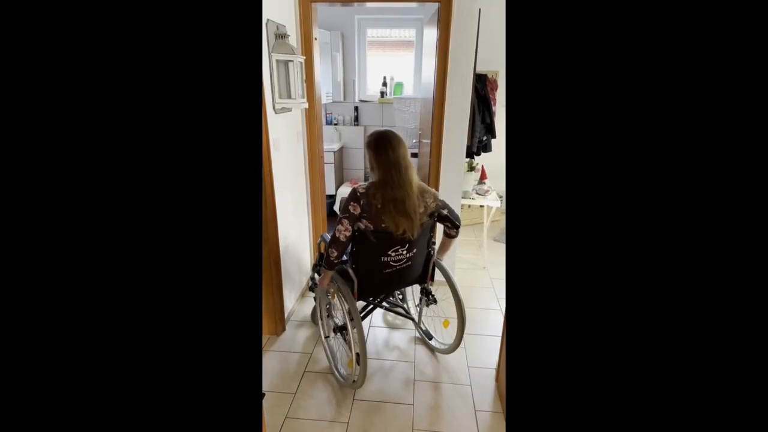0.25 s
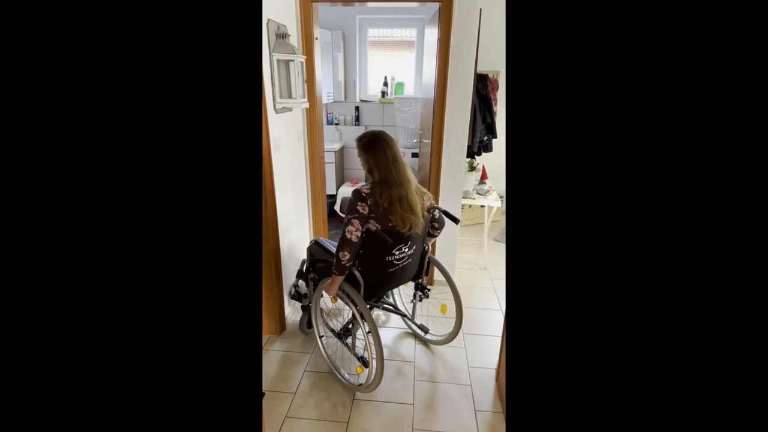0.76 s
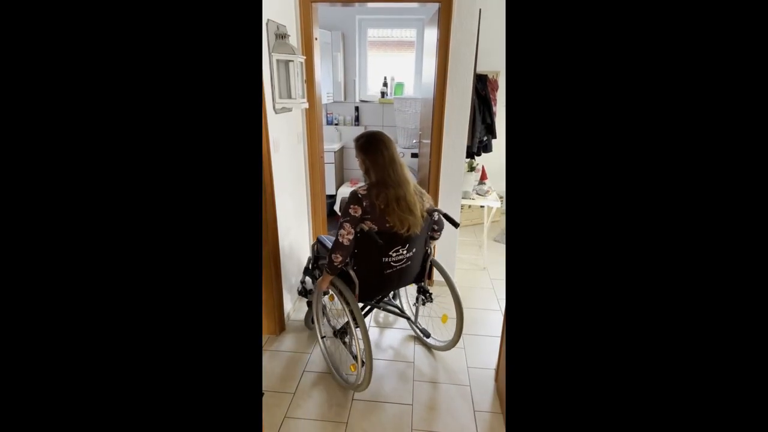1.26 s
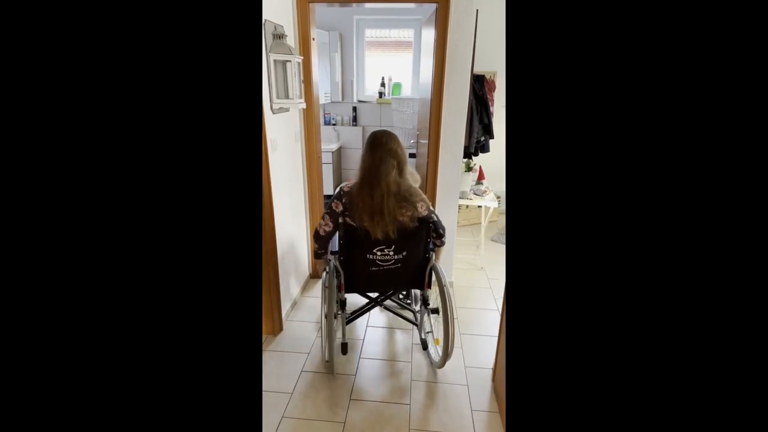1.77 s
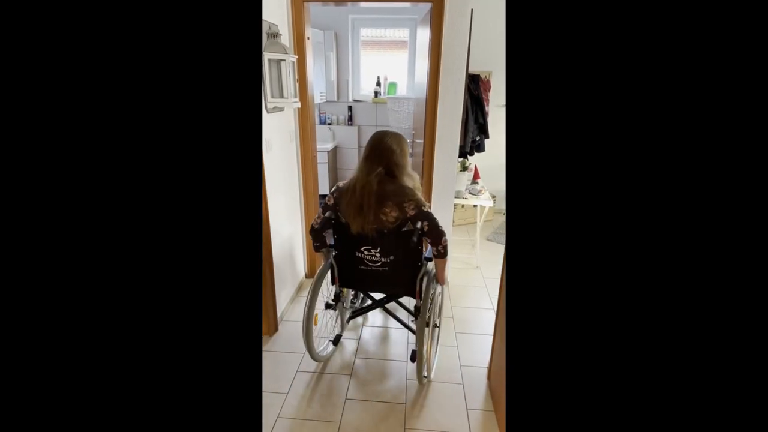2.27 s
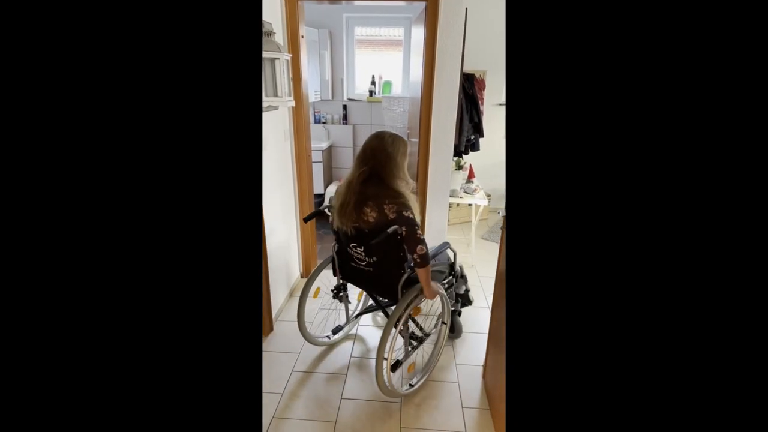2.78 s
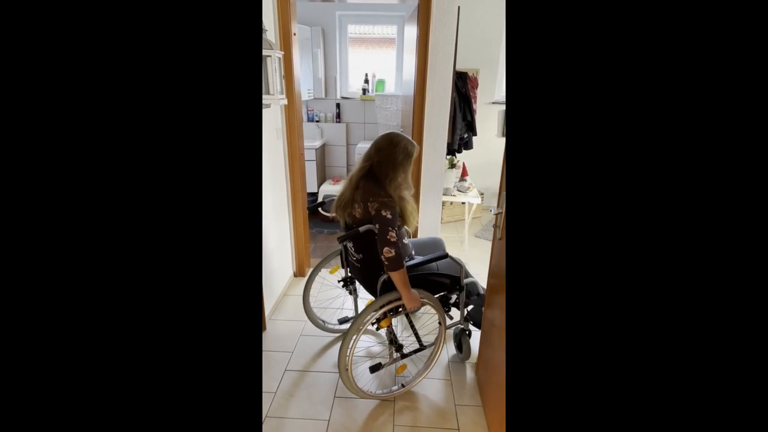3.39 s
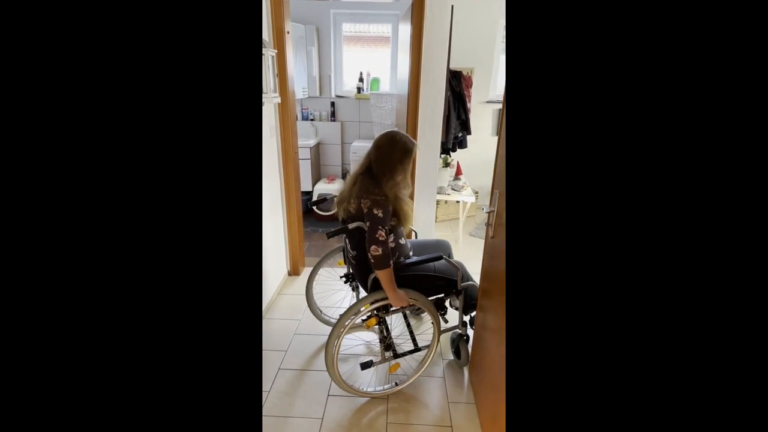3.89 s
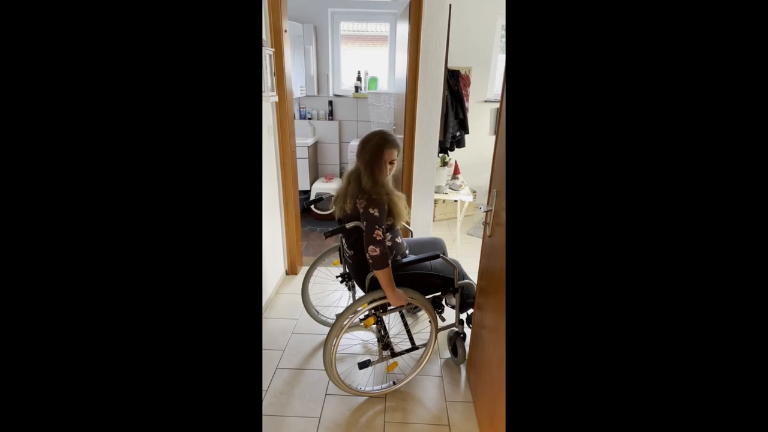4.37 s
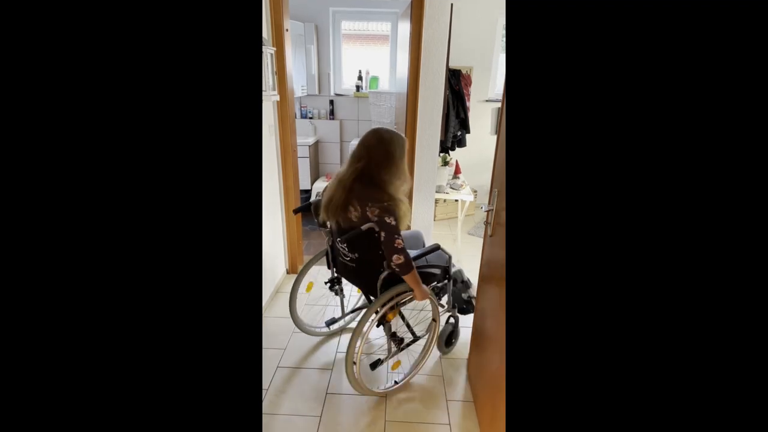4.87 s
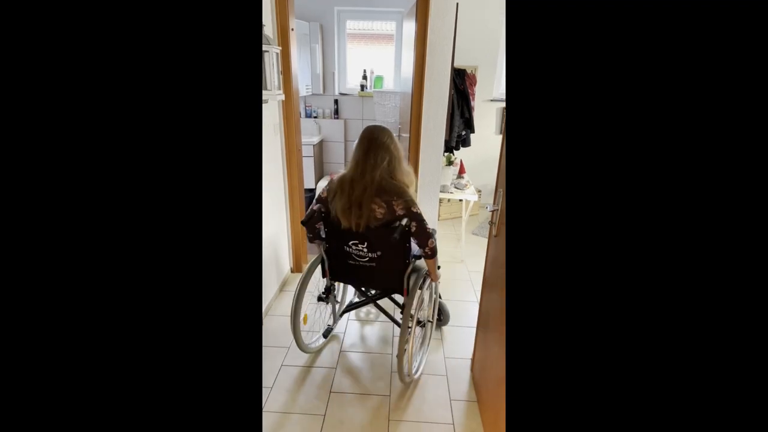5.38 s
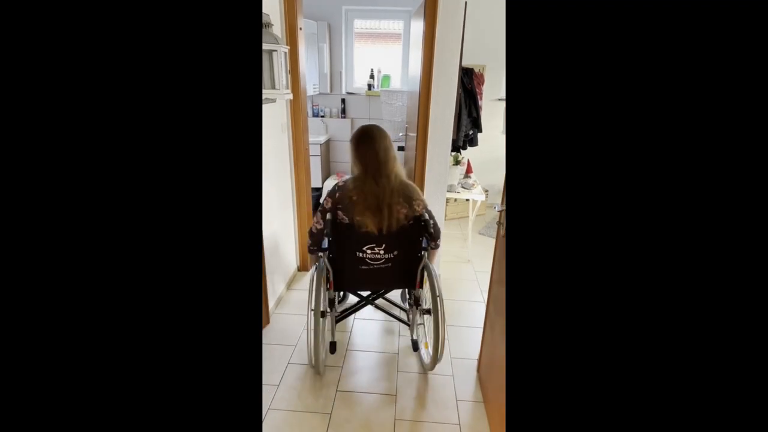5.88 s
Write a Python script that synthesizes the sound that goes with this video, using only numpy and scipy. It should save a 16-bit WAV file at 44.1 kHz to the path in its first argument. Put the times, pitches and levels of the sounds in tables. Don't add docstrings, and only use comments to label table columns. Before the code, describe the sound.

A wheelchair pivots back and forth on hallway tiles: palms scrape the metal rims, small ticks and squeaks, a dull wooden knock, sharp lever clicks.

```python
import sys
import numpy as np
from scipy import signal
from scipy.fft import rfft, irfft, next_fast_len
from scipy.io import wavfile
from scipy.ndimage import uniform_filter1d, map_coordinates

SR = 44100
rng = np.random.default_rng(int(sys.argv[2]) if len(sys.argv) > 2 else 0)


def level_to_linear(level):
    exponent = np.asarray(level, float) / 20
    return 10 ** exponent


def wav_out(sig):
    wavfile.write(sys.argv[1], SR, np.round(np.clip(np.atleast_2d(sig).T, -1, 1) * 32767).astype(np.int16))


N = 270935
T = np.arange(N) / SR


def unit(x):
    return x / np.sqrt(np.mean(x ** 2))


def add(out, start_s, wave):
    i = int(start_s * SR)
    lo, hi = max(i, 0), min(i + len(wave), N)
    out[lo:hi] += wave[lo - i:hi - i]


def decay(t, t60_s):
    return 1000. ** (-t / t60_s)


def onset(t, build_s):
    return 1 - np.exp(-t / build_s)


def walk(rate):
    k = int(SR / rate)
    levels = rng.standard_normal(N // k + 1)
    return 0.77 * uniform_filter1d(np.repeat(levels, k), k)[:N]


def slips(rate, scatter_db, flutter_db):
    ticks = (rng.random(N) < rate / SR) * rng.standard_normal(N)
    size_db = scatter_db * np.minimum(rng.exponential(size=N), 3.5)
    return unit(ticks * level_to_linear(size_db + flutter_db * walk(60)))


def ring(x, hz, width):
    return signal.lfilter(*signal.iirpeak(hz, hz / width, SR), x)


def body(x, modes, patchy_db, rate):
    out = np.zeros(N)
    for k, (hz, width, db) in enumerate(modes):
        level = level_to_linear(db + patchy_db * walk(rate))
        out += (-1) ** k * level * ring(ring(x, hz, 1.8 * width), hz, 3 * width)
    return unit(out)


def rings(modes, pitch, t, detune):
    out = np.zeros(len(t))
    for hz, db, t60_s in modes:
        weight, shift = rng.standard_normal(2)
        tone = np.sin(2 * np.pi * hz * pitch * (1 + detune * shift) * t)
        out += level_to_linear(db + 53 * detune * weight) * tone * decay(t, t60_s)
    return out


def contacts(rows, touch_db, rise, release_db_per_s):
    touch_s = .009
    power, t = np.zeros(N), T[:SR] - touch_s
    for start_s, length_s, db in rows:
        length_s = max(length_s, .005)
        corners_s = [-touch_s, 0, rise * length_s, length_s + 1e-4, length_s + 1]
        shape_db = np.interp(t, corners_s, [-40, touch_db, 0, 0, -release_db_per_s])
        add(power, start_s - touch_s, level_to_linear(2 * (db + shape_db)))
    return np.sqrt(power)


def bend(x, share):
    drift = share * walk(9)
    warped = np.arange(N) + np.cumsum(drift - drift.mean())
    return map_coordinates(x, [warped], order=1, mode="mirror")


def air():
    # pitch_hz, density_db (per Hz)
    spectrum = [(59, -47), (100, -17.5), (124, -20.5), (206, -25), (389, -32.5), (784, -39.5), (854, -43.5),
                (2420, -44.5), (16000, -60.5)]
    hz, db = np.transpose(spectrum)
    log_hz = np.log(np.fft.rfftfreq(N, 1 / SR) + 1)
    shape = level_to_linear(np.interp(log_hz, np.log(hz), db))
    return level_to_linear(-74.5) * unit(irfft(shape * rfft(rng.standard_normal(N)), N))


def sleeves():
    # start_s, length_s, level_db
    brushes = [
        (-.1, 0.28, -59.5),
        (.3, 0.2, -70),
        (2.22, 0.24, -58.5),
        (2.95, 0.26, -66),
        (4.75, 0.43, -62.5),
        (5.78, 0.06, -62),
        (6.03, .06, -58),
    ]
    # pitch_hz, width_hz, level_db
    cloth = [(5640, 2900, -8.5), (8100, 2300, -10.5), (10100, 1360, -7), (17300, 1440, 2.5)]
    rustle = body(slips(rate=12000, scatter_db=-3.0, flutter_db=1.5), cloth, patchy_db=5.5, rate=5.0)
    return contacts(brushes, touch_db=-4, rise=0.87, release_db_per_s=79) * rustle


def tyres():
    # time_s, level_db
    rolling = [(0, -62), (.34, -68.5), (.5, -62.5), (.62, -77), (.67, -59), (.83, -57), (1.08, -77),
               (1.34, -69), (1.37, -61.5), (2.03, -62.5), (2.2, -67), (2.42, -66), (3.2, -69.5),
               (3.55, -56), (3.81, -68), (4.35, -69.5), (4.52, -66), (6.14, -67.5)]
    # pitch_hz, width_hz, level_db
    floor = [(51, 12, 3), (89.6, 30, -13)]
    # start_s, length_s, level_db
    scrubs = [(.05, 0.063, -53), (.282, 0.017, -48.5), (.655, 0.094, -49.5), (.88, 0.08, -84),
              (1.1, 0.12, -60), (1.36, 0.08, -59), (1.535, 0.095, -47.5), (1.78, 0.33, -53.5),
              (2.2, 0.12, -60), (2.47, 0.056, -54), (2.75, 0.063, -58), (2.9, 0.28, -62.5),
              (3.5, 0.08, -59), (4.43, 0.33, -54.5), (4.85, 0.063, -64), (5.0, 0.14, -64),
              (5.14, 0.15, -58.5), (5.4, 0.17, -67), (5.56, 0.072, -49), (5.755, 0.028, -48),
              (5.885, 0.03, -52), (5.81, .03, -58), (2.255, 0.034, -55.5), (2.53, 0.038, -56),
              (.16, 0.049, -62), (5.98, 0.089, -52)]
    # pitch_hz, width_hz, level_db
    rubber = [(140, 45, -7), (207, 55, 1), (260, 50, 0), (325, 70, -4), (430, 120, -9), (560, 160, -12)]
    weight = level_to_linear(np.interp(T, *np.transpose(rolling)))
    boom = weight * body(rng.standard_normal(N), floor, patchy_db=2.5, rate=8)
    judder = body(slips(rate=1500, scatter_db=2.2, flutter_db=2.2), rubber, patchy_db=1.5, rate=14)
    scrub = contacts(scrubs, touch_db=-6, rise=0.23, release_db_per_s=161) * judder
    return boom + level_to_linear(-5.0) * scrub


def knock():
    # start_s, door_db, wall_db, pitch_factor
    bumps = [(0.66, -41.5, -56, 0.78), (1.362, -65, -52.5, 1.06), (2.37, -59.5, -58, 1.07),
             (2.849, -69, -59.5, 1.15), (3.322, -60, -56, 1.03), (3.82, -34, -41, 1.15),
             (3.831, -34, -65, 0.98), (3.859, -35.5, -57, .95), (3.887, -41, -35.5, 1.05),
             (3.968, -53, -41, 1.27), (5.569, -47.5, -60.5, 0.83)]
    # pitch_hz, level_db, t60_s
    door = [(199, -2, 0.16), (261, -7, 0.26), (311.6, -1.5, 0.14), (441.6, -5.5, 0.086),
            (560, -15.5, 0.089), (670, -8.5, 0.074), (858, -17.5, 0.057), (970, -11, 0.065),
            (1425, -21, 0.073)]
    # pitch_hz, level_db, t60_s
    wall = [(50, -8, .35), (87, 1.5, .75), (99, -6, .5), (120, -11, .3), (155, -11, .4), (205, -14, .4)]
    out, t = np.zeros(N), T[:30000]
    for start_s, door_db, wall_db, pitch in bumps:
        wood = rings(door, pitch, t, 0.027) * onset(t, 0.0025)
        boom = rings(wall, 0.96, t, 0.0008) * onset(t, 0.0036)
        add(out, start_s, level_to_linear(door_db) * wood + level_to_linear(wall_db) * boom)
    return out


def clicks():
    # start_s, level_db, pitch_hz, t60_s, treble_db (relative)
    snaps = [
        (4.5073, -18.5, 1050, .02, -34),
        (4.5078, -24, 1550, .014, -40),
        (4.5085, -25, 3300, .012, -40),
        (4.5125, -29, 2900, .016, -40),
        (4.5186, -14, 2950, .009, -52),
        (5.6145, -25, 2050, .012, -30),
        (5.6148, -29, 2900, .012, -40),
        (5.6155, -30, 960, .024, -40),
    ]
    # start_s, level_db, pitch_hz, treble_db (relative)
    joints = [(.059, -44.5, 506, -25), (.223, -38.5, 740, -18), (.279, -38, 900, -35),
              (.215, -50, 726, -30), (.244, -36, 620, -30), (.288, -38, 654, -35), (.308, -40, 256, -40),
              (.328, -46, 400, -40), (2.2, -43, 1200, -25), (2.203, -54, 750, -30), (2.484, -40, 298, -29),
              (3.999, -45, 1150, -35), (4.471, -42, 640, -15), (5.366, -56, 842, -20),
              (5.729, -43, 1040, -28), (5.893, -38.5, 400, -35), (5.77, -43, 440, -25),
              (.657, -41, 670, -4), (2.185, -43, 1010, -19), (2.452, -47.5, 735, -34),
              (2.47, -48.5, 460, -4), (1.536, -34.5, 960, -37), (1.212, -31.5, 926, -35),
              (2.856, -42, 990, -39), (2.531, -42, 1000, -24), (2.756, -39, 864, -34),
              (2.757, -39, 560, -37), (2.772, -37.5, 510, -36), (3.085, -49.5, 800, -22),
              (3.436, -63, 920, 7), (3.516, -43.5, 705, -33), (3.538, -41.5, 1080, -17),
              (4.421, -49.5, 636, 8.5), (4.44, -33, 645, -30), (4.551, -36, 780, -28), (4.617, -39, 640, 2),
              (4.671, -32.5, 646, -12), (5.134, -36, 790, -7), (5.396, -55, 850, 11),
              (5.615, -34, 700, -35), (5.976, -39, 1030, -0.5), (6.13, -29, 425, -24)]
    # start_s, level_db, pitch_hz, treble_db (relative)
    ticks = [(.058, -38.5, 2370, -15), (.108, -45, 2000, -15), (.178, -41, 3100, -14),
             (.191, -41, 2300, -10), (.205, -46, 3080, -1), (.223, -33, 1660, -13),
             (.276, -30.5, 1830, -25), (.226, -35, 2210, -20), (.226, -36, 3630, -20),
             (.258, -46, 3100, -18), (.415, -56, 1640, -30), (2.531, -43, 2100, -22),
             (4.44, -31, 1440, -19), (4.874, -46, 1530, -9), (4.94, -46, 2430, -10),
             (5.045, -44.5, 5300, -6), (5.074, -41, 1560, -15), (5.587, -36, 1720, -23),
             (5.788, -43, 2060, -25), (1.814, -29.5, 2940, -14), (2.1, -36, 3650, -7.5),
             (1.503, -54, 3140, -7), (4.508, -24, 2180, -15), (3.833, -48, 2480, -0.5),
             (3.86, -48, 2020, -1), (3.888, -52, 2000, 2), (5.6, -49, 3500, -3), (6.002, -33.5, 3560, -20),
             (.617, -44.5, 3190, 0.5), (.706, -28, 3500, -27), (.922, -45, 3090, -10),
             (1.091, -31, 3340, -20), (1.209, -24, 1590, -35), (1.214, -39, 1930, -28),
             (1.536, -30, 3060, -3), (3.539, -38.5, 2030, -9), (1.928, -45, 2070, 10),
             (2.0, -32.5, 3560, -1.5), (2.087, -35.5, 3480, -4), (2.181, -37, 1940, -11),
             (2.201, -34, 2400, -24), (2.214, -32.5, 2280, -28), (3.205, -55.5, 4210, -20),
             (2.854, -34.5, 2210, -43), (2.853, -33.5, 1440, -40), (3.999, -44, 2200, -45),
             (4.982, -45, 1500, -4), (5.207, -35, 2980, -12), (5.234, -35, 2960, -8.5),
             (5.729, -40.5, 4140, -14), (6.033, -36.5, 2770, -5)]
    rows = [*snaps]
    for table, t60_s in ((joints, 0.022), (ticks, 0.015)):
        rows += [(start_s, db, hz, t60_s, treble_db) for start_s, db, hz, treble_db in table]
    out, t = np.zeros(N), T[:6000]
    for start_s, db, hz, t60_s, treble_db in rows:
        noise = rng.standard_normal(len(t))
        tone = np.sin(2 * np.pi * hz * t) + 0.12 * np.sin(2 * np.pi * 2.4 * hz * t)
        rough = 1.45 * ring(ring(noise, hz, 0.73 * hz), hz, 1.44 * hz)
        crack = level_to_linear(treble_db) * 2 * ring(noise, 6950, 4300) * decay(t, 0.025)
        add(out, start_s, level_to_linear(db - 1.4) * ((tone + rough) * decay(t, t60_s) * onset(t, 0.001) + crack))
    return out


def squeaks():
    # start_s, length_s, pitch_hz, level_db, roughness_hz
    chirps = [(.858, .044, 900, -51.5, 30), (1.095, .12, 3650, -45, 350), (1.11, .09, 3150, -47, 300),
              (2.0, .13, 3600, -53, 200), (4.89, .04, 4150, -60, 150), (5.075, .04, 4150, -59, 150),
              (5.4, .06, 830, -54, 250), (5.41, .09, 2950, -55, 250), (5.99, .08, 3650, -51, 300),
              (2.86, .1, 2150, -60, 600), (5.135, .06, 3150, -46, 500), (5.205, .05, 3000, -48, 500),
              (5.135, .06, 790, -56, 600), (4.99, .07, 5250, -57, 900), (5.392, .11, 5450, -45.5, 1100),
              (5.47, .1, 5600, -53, 500), (.655, .07, 3150, -49, 300), (.93, .055, 3150, -47, 300),
              (1.855, .05, 3200, -45, 200), (4.53, .06, 2900, -48, 500), (1.93, .06, 2050, -53, 200),
              (5.98, .1, 2100, -53, 300), (5.44, .05, 1350, -50, 700), (5.62, .04, 2750, -46, 800),
              (5.785, .045, 1980, -50, 200), (5.785, .045, 3580, -52, 300)]
    out = np.zeros(N)
    for start_s, length_s, hz, db, rough_hz in chirps:
        t = T[:int(length_s * SR)]
        fall_db = 1.6 - .04 * rough_hz
        phase = 2 * np.pi * hz * t * (1 + .045 * t / length_s / 2)
        stack = sum(level_to_linear(fall_db * k) * np.sin((k + 1) * phase) for k in range(int(6500 // hz)))
        steady = .3 + 60 / rough_hz
        tremble = (steady + unit(walk(rough_hz))[:len(t)]) / np.hypot(1, steady)
        add(out, start_s, level_to_linear(db) * stack * tremble * np.hanning(len(t)) ** 0.34)
    return out


def hands():
    # start_s, length_s, ring_db, frame_db (relative), skin_db (relative)
    left_strokes = [(.616, 0.012, -56, -9, 4), (.655, 0.008, -43.5, -6, 3.5), (.688, 0.035, -43.5, -4.5, 4),
                    (.858, 0.015, -50, -7, 12), (.874, 0.018, -43, -18, 3.5),
                    (.919, 0.012, -42.5, -14, 6.5), (.941, 0.017, -43, -17.5, 3),
                    (.964, 0.01, -44, -17, -6), (1.09, 0.03, -40.5, -10.5, 0.5),
                    (1.118, 0.085, -43, -14.5, 1.5), (1.209, 0.027, -40.5, -8, 3.5),
                    (1.25, 0.034, -44.5, -32, 5), (1.49, 0.062, -51.5, -13, -3),
                    (1.534, 0.11, -45, -5.5, 6), (1.775, 0.032, -50, -4, 8.5), (1.793, 0.089, -41, -7.5, 5),
                    (1.852, 0.022, -49, -21, 4), (1.928, 0.038, -42.5, -8, 3), (2.0, 0.039, -49.5, 1.5, 6),
                    (2.087, 0.023, -52, 1, 7.5), (1.385, 0.042, -68, 10, -6)]
    # start_s, length_s, ring_db, frame_db (relative), skin_db (relative)
    right_strokes = [(0, 0.01, -63.5, 4, -3), (0.056, 0.006, -64, 14, -8), (.105, 0.012, -63.5, 4, 0),
                     (.172, 0.031, -55, -8, 6), (0.215, 0.0079, -50, 7.5, 0), (0.273, 0.011, -68, 8, -3),
                     (5.798, 0.0075, -67, -28, 20.5), (2.183, 0.025, -53, 5, -11),
                     (2.468, 0.072, -66, 10.5, -6), (2.601, 0.17, -72, -3, 9.5),
                     (2.752, 0.029, -80.5, 21.5, -3), (2.849, 0.028, -62, 9.5, -24),
                     (2.962, 0.15, -67.5, 1.5, 1.5), (3.2, 0.0086, -74.5, -2, -12),
                     (3.429, 0.058, -70, 0.5, 8), (3.535, 0.016, -60.5, 2.5, 5.5),
                     (3.58, 0.086, -68.5, -5, -3), (3.82, 0.022, -51.5, 7, -4), (4.89, 0.037, -71, 0, 3),
                     (4.76, .08, -69, -3.5, 5), (4.7, 0.029, -58.5, -1.5, -12),
                     (5.207, 0.0077, -55, -1, 12.5), (5.234, 0.0067, -55.5, 2, 9),
                     (2.531, 0.013, -76, 6, -7), (4.421, 0.023, -54.5, 6.5, 8),
                     (4.437, 0.042, -51, 4.5, -2), (4.509, 0.0064, -44.5, 4, -20),
                     (4.551, 0.14, -51.5, 2.5, 7), (4.85, 0.11, -63.5, 1, 1), (4.985, 0.07, -56, 3.5, 6.5),
                     (5.131, 0.041, -48, 2, 1), (5.396, 0.075, -49, 1, 12), (5.5, 0.069, -54.5, 7, -1),
                     (5.613, 0.0062, -49, 5, -27), (5.785, 0.045, -56, 5.5, -7), (5.7, 0.084, -62, 6, -7),
                     (5.88, 0.044, -63.5, 5, -5), (5.974, .012, -50, 3, 3), (5.99, 0.082, -50, 1, 1)]
    # pitch_hz, width_hz, level_db
    left_modes = [(2070, 80, -3), (2300, 80, -8), (3030, 80, 0), (3200, 75, 3), (3320, 70, 0),
                  (4350, 120, -6)]
    # pitch_hz, width_hz, level_db
    free_modes = [(3590, 85, 3), (3750, 75, 0), (3970, 50, -6), (4550, 120, -8), (5550, 110, -6)]
    # time_s, freedom_db
    loose_grip = [(.6, -7), (.69, 7), (.725, 3), (.76, 2), (.89, 10), (.92, -8.5), (.97, 2.5), (1.1, 2.5),
                  (1.24, 0), (1.29, -2), (1.55, -6.5), (1.63, -5.5), (1.81, -8), (1.87, -2), (1.915, 0),
                  (1.94, -3), (1.99, 1.5), (2.01, -1), (2.12, 5.5)]
    # pitch_hz, width_hz, level_db
    right_modes = [(2150, 260, -0.5), (2640, 70, -11), (2967, 144, 2.5), (3224, 42, 0), (3480, 370, -1.5),
                   (4200, 68, -19)]
    # pitch_hz, width_hz, level_db
    frame_modes = [(545, 193, -4.5), (657, 70, 1), (779, 59, 1.5), (1030, 144, 1), (1380, 47, -9),
                   (1564, 51, 0)]
    # pitch_hz, width_hz, level_db
    skin_modes = [(5180, 1870, 6), (5970, 370, -29), (7340, 950, -3.5), (7320, 94, 23), (6940, 2400, -33)]
    # pitch_hz, width_hz, level_db
    grit_modes = [(8050, 830, -2.5), (9590, 2040, 6), (10120, 540, 6), (11700, 6900, -12),
                  (14700, 1200, -0.5)]
    rim_drift = .016

    grip = slips(rate=4500, scatter_db=2.6, flutter_db=3.2)
    fine = slips(rate=14000, scatter_db=1.6, flutter_db=2.8)
    broad = unit(ring(fine, 2490, 1480))

    free = level_to_linear(np.interp(T, *np.transpose(loose_grip)) / 2)
    tube = body(grip, left_modes, patchy_db=3.5, rate=25) / free
    tube += free * body(grip, free_modes, patchy_db=3.5, rate=25)
    left = bend(unit(tube), rim_drift) + level_to_linear(-7.5) * broad
    right = body(grip, right_modes, patchy_db=3.5, rate=12) + level_to_linear(-6) * broad

    frame = bend(body(grip, frame_modes, patchy_db=4, rate=20), 2 * rim_drift)
    frame += level_to_linear(3.0) * unit(ring(fine, 800, 1610))

    skin = body(fine, skin_modes, patchy_db=2.5, rate=12)
    skin += level_to_linear(-3) * body(fine, grit_modes, patchy_db=2.5, rate=12)
    skin += level_to_linear(-6) * unit(ring(ring(fine, 7000, 7000), 7000, 7000))

    rims = np.zeros(N)
    for strokes, rim in ((left_strokes, left), (right_strokes, right)):
        rows = [(start_s, length_s, db) for start_s, length_s, db, _, _ in strokes]
        rims += contacts(rows, touch_db=-6.5, rise=0.87, release_db_per_s=253) * unit(rim)
    both = [*left_strokes, *right_strokes]
    frame_rows = [(start_s, length_s, db + frame_db) for start_s, length_s, db, frame_db, _ in both]
    skin_rows = [(start_s, length_s, db + skin_db) for start_s, length_s, db, _, skin_db in both]
    hum = contacts(frame_rows, touch_db=-2, rise=0.27, release_db_per_s=153) * unit(frame)
    hiss = contacts(skin_rows, touch_db=-0.45, rise=0.19, release_db_per_s=207) * unit(skin)
    return rims + level_to_linear(-3.0) * hum + level_to_linear(-7.5) * hiss


def echo(x, t60_s):
    treble_hz, treble_share = 4500, .38
    t = T[:int(t60_s * SR)]
    noise = rng.standard_normal(len(t))
    low = signal.lfilter(*signal.butter(2, treble_hz, fs=SR), noise)
    high = (noise - low) * decay(t, t60_s) ** (1 / treble_share - 1)
    tail = (low + high) * decay(t, t60_s) * onset(t, 0.0021)
    return signal.fftconvolve(x, tail / np.sqrt(np.sum(tail ** 2)))[:N]


def ports(x):
    # pitch_hz, lead_rad
    port_lead = [(60, .06), (125, .09), (250, .24), (600, .5), (900, .45), (1300, .3), (1900, .06),
                 (2500, .6), (3000, 1.4), (4000, 1.0), (5150, .3), (7200, 2.93), (7700, 3.14), (8150, 3.38),
                 (10600, 6.22), (11500, 6.33), (13400, 9.36), (14800, 9.46), (15700, 10.5)]
    # pitch_hz, likeness (0-1)
    port_likeness = [(200, .9), (600, .4), (1200, .6), (3000, 0), (5000, .4), (9000, .65), (13000, 0.35)]
    # pitch_hz, balance_db
    port_balance = [(70, 0), (180, 1.4), (350, 2.5), (700, 3), (1400, 1.1), (2400, .2), (3000, .2)]
    size = next_fast_len(N)
    hz = np.fft.rfftfreq(size, 1 / SR)
    lead = np.interp(hz, *np.transpose(port_lead))
    like = np.interp(hz, *np.transpose(port_likeness))
    tilt_db = np.interp(hz, *np.transpose(port_balance))
    side = np.array([[1], [-1]])
    near = rfft(x, size)
    other = like * near + np.sqrt(1 - like ** 2) * rfft(echo(x, .12), size)
    both = np.cos(lead / 2) * near + side * 1j * np.sin(lead / 2) * other
    return irfft(both * level_to_linear(side * tilt_db / 2), size)[:, :N]


def scene():
    hits = clicks()
    rub = hands() + sleeves() + tyres() + knock() + squeaks()
    hall = level_to_linear(-4.5) * echo(level_to_linear(-6.5) * hits + level_to_linear(-7) * rub, t60_s=0.52)
    return ports(hits + rub + hall + air())


def band_limit(x):
    return signal.sosfilt(signal.butter(12, 17130, fs=SR, output="sos"), x)


def record(dry):
    x = signal.sosfilt(signal.butter(7, 33, "high", fs=SR, output="sos"), dry)
    x = signal.sosfilt(signal.ellip(8, .2, 60, 15800, fs=SR, output="sos"), x)
    return band_limit(x)


dry = scene()
out = record(dry)
wav_out(out)
```